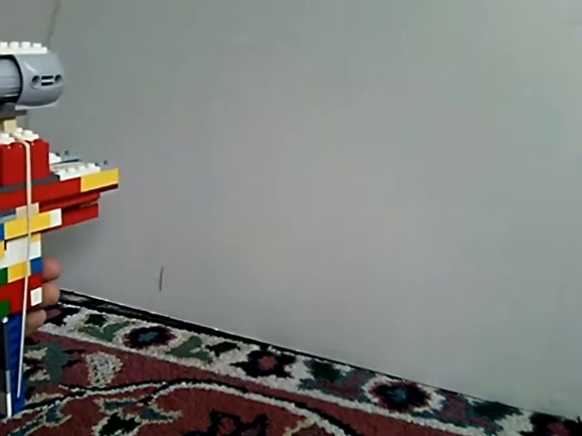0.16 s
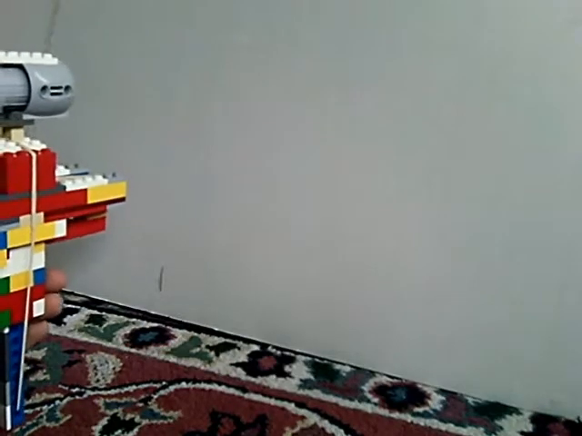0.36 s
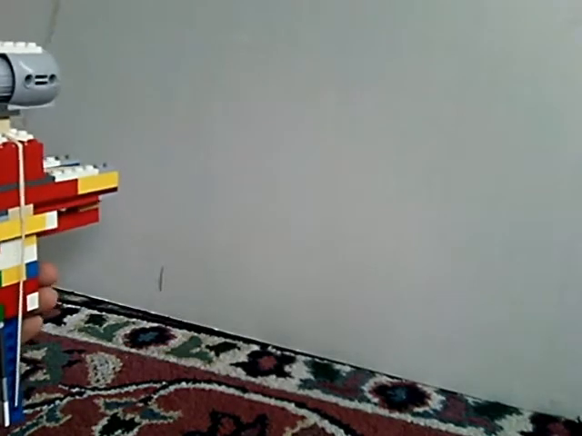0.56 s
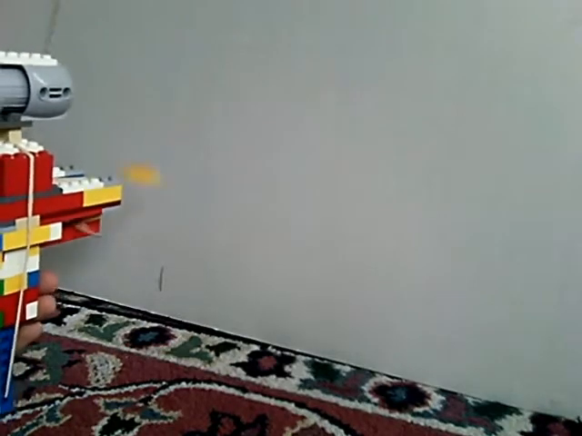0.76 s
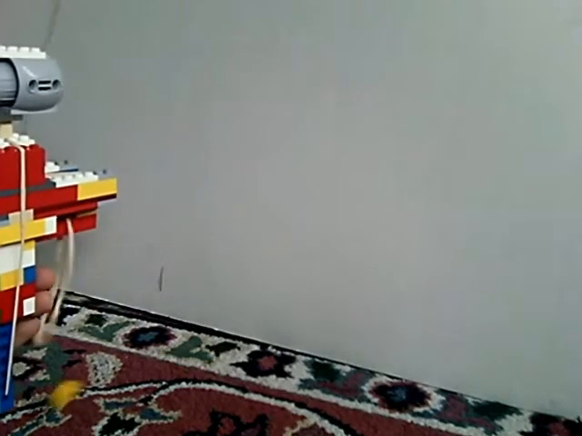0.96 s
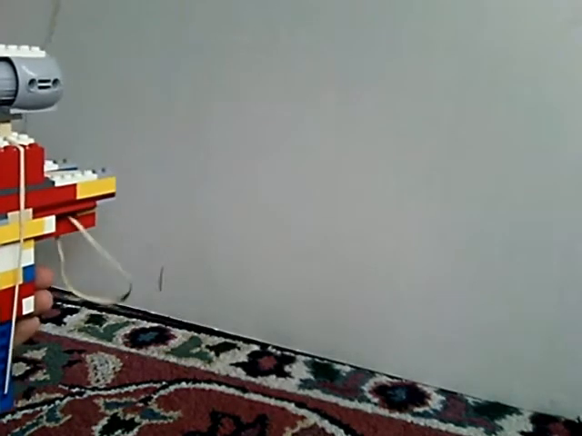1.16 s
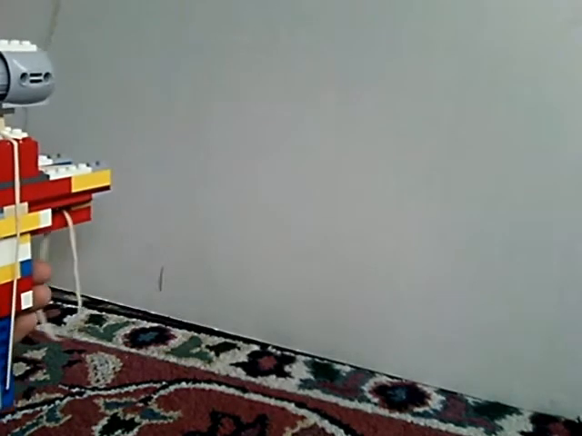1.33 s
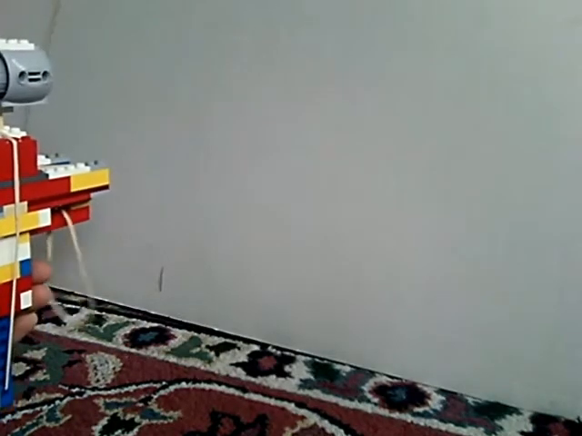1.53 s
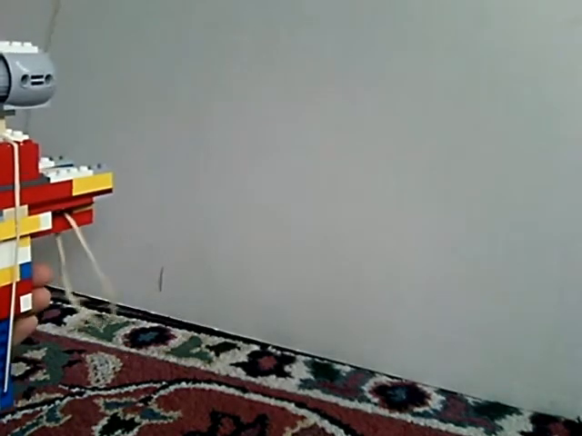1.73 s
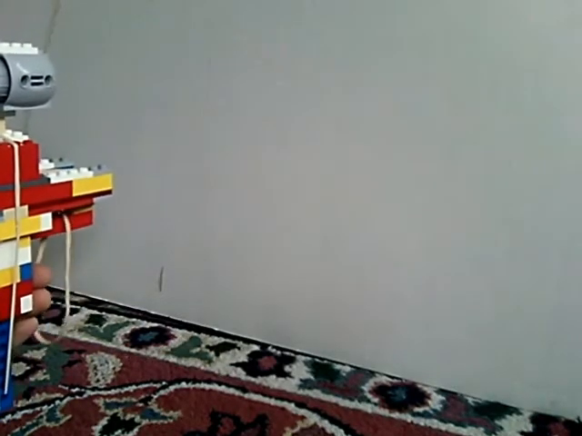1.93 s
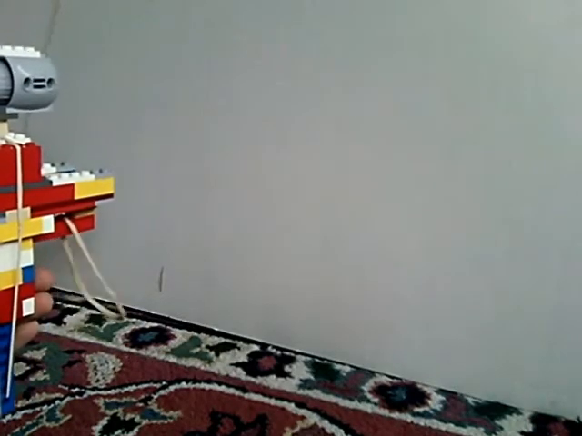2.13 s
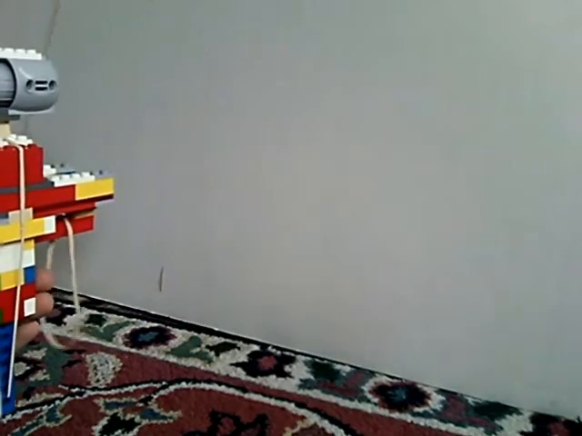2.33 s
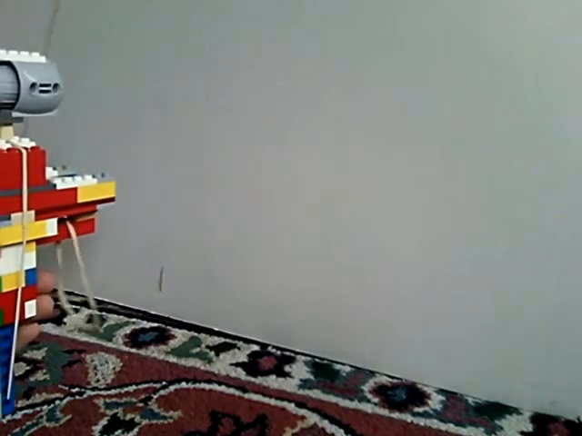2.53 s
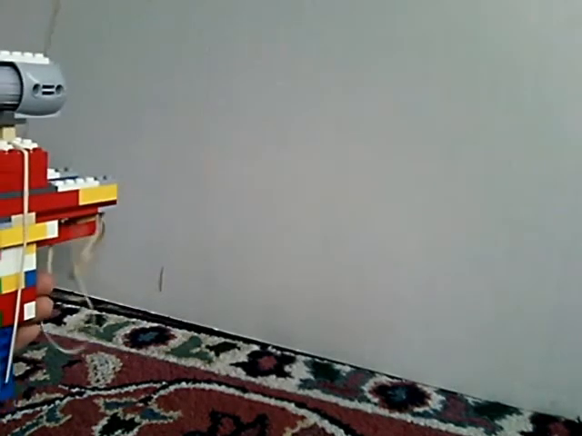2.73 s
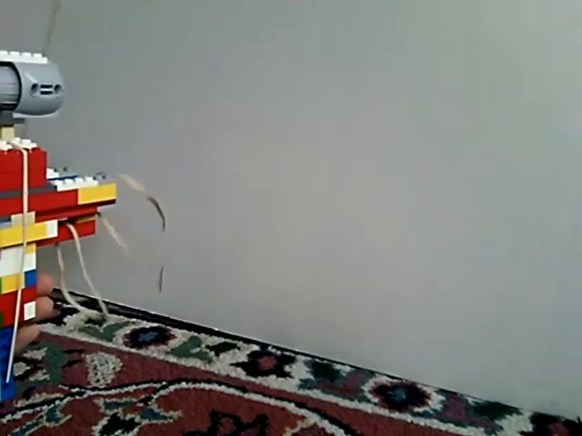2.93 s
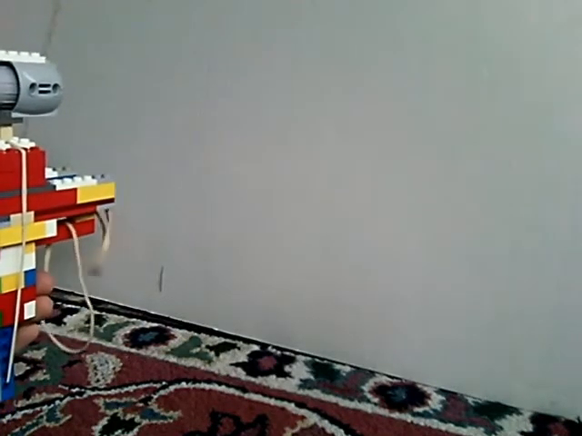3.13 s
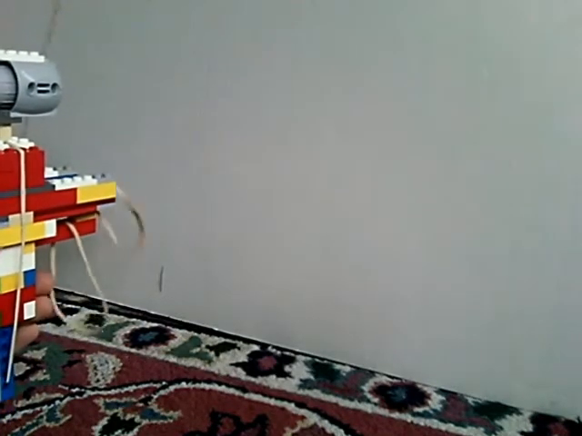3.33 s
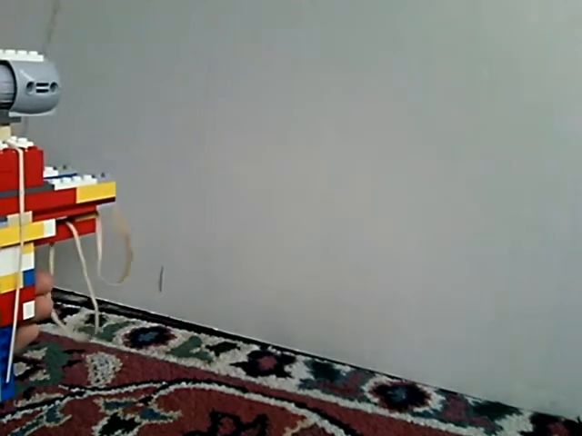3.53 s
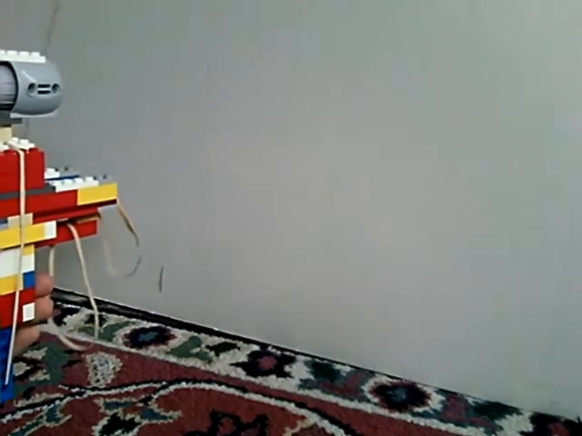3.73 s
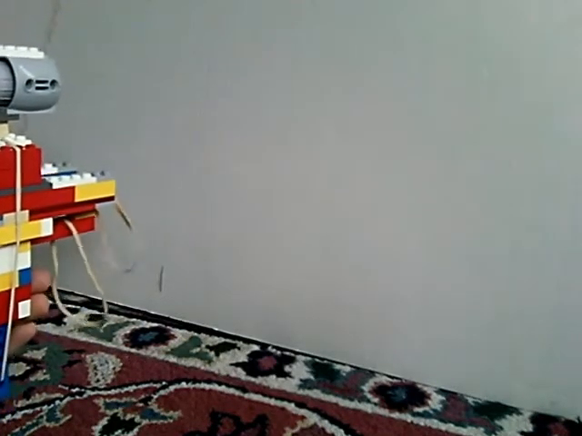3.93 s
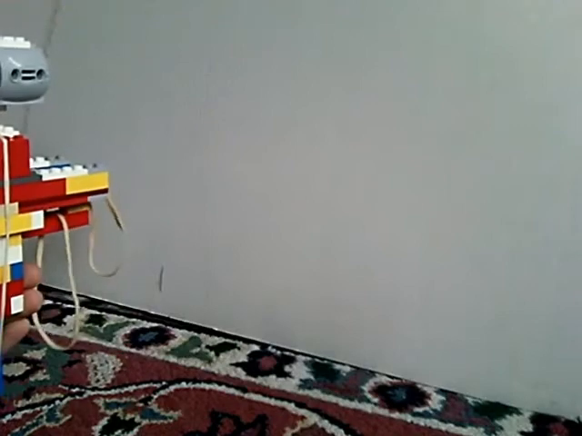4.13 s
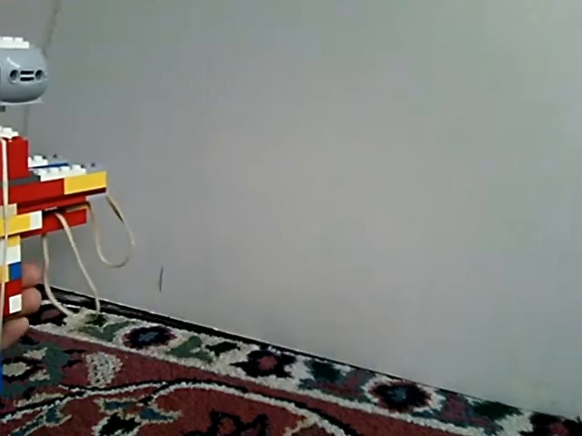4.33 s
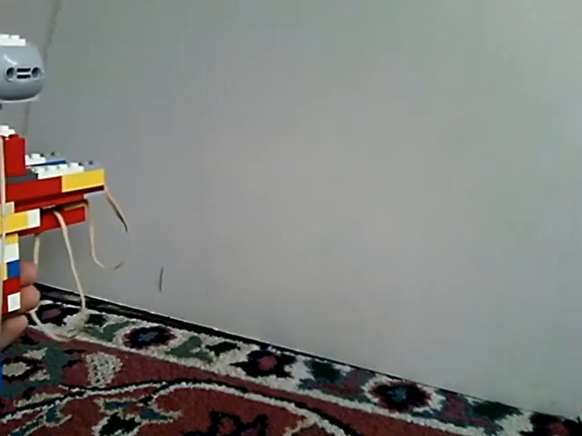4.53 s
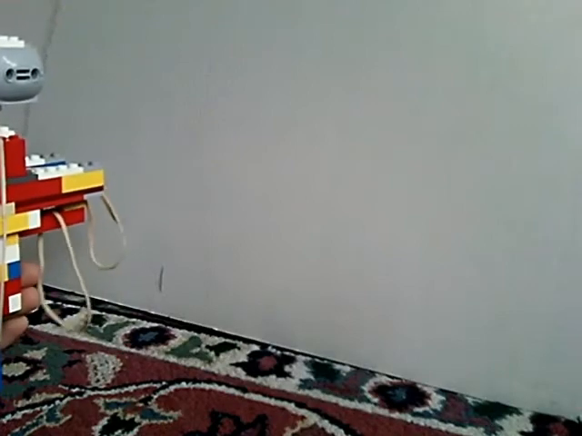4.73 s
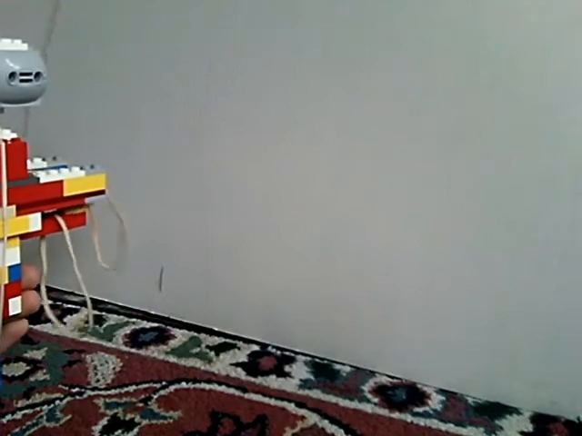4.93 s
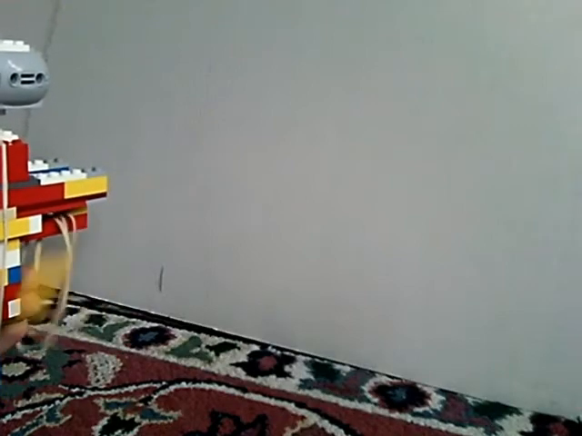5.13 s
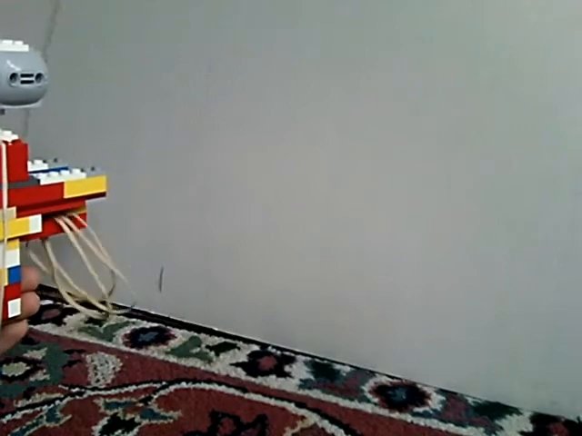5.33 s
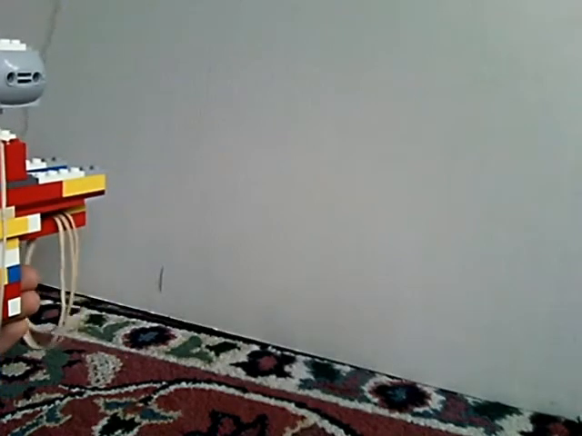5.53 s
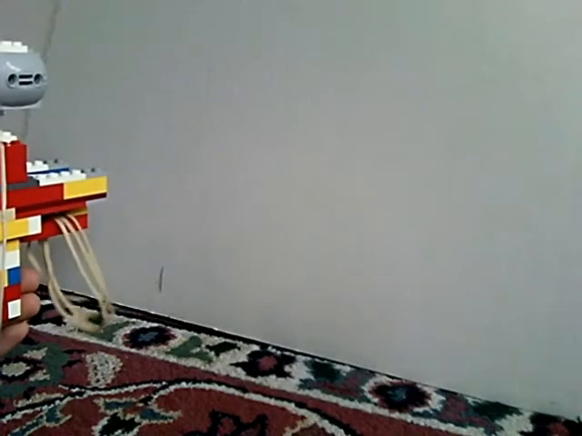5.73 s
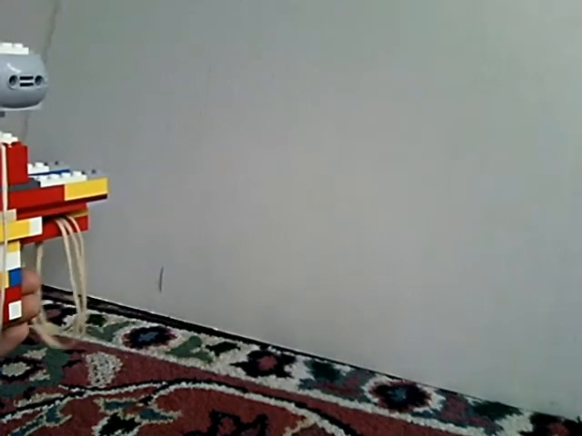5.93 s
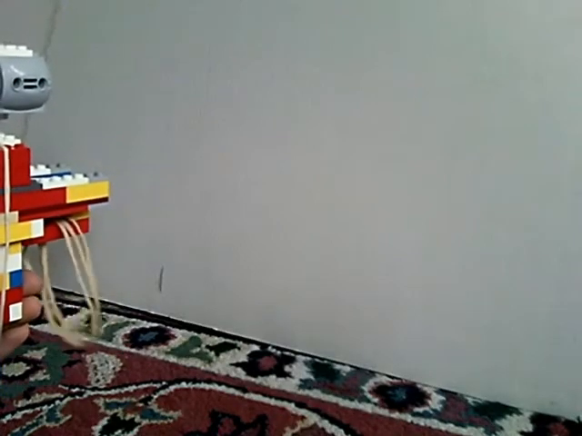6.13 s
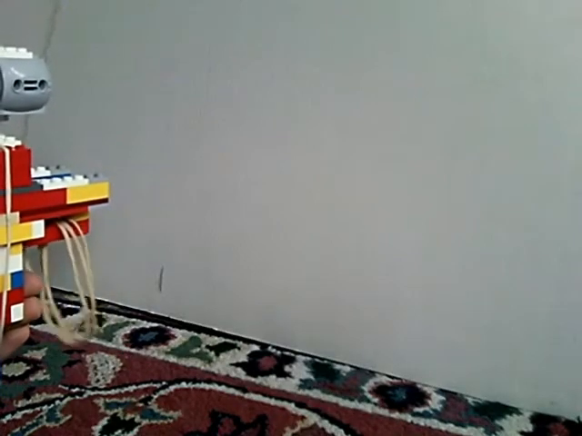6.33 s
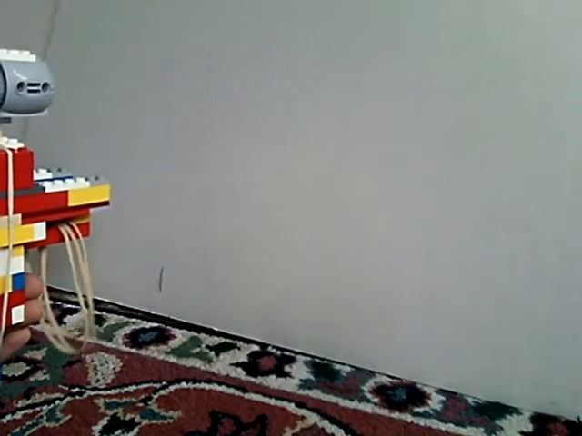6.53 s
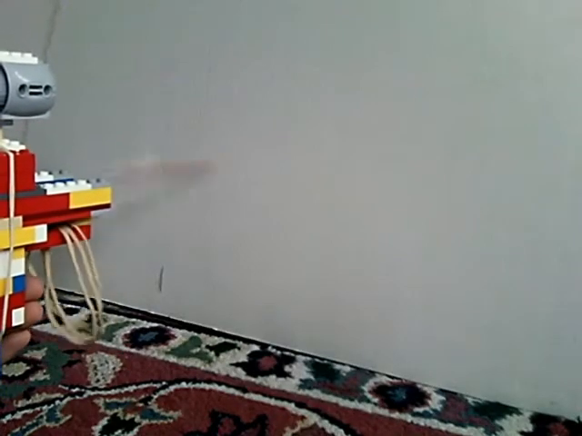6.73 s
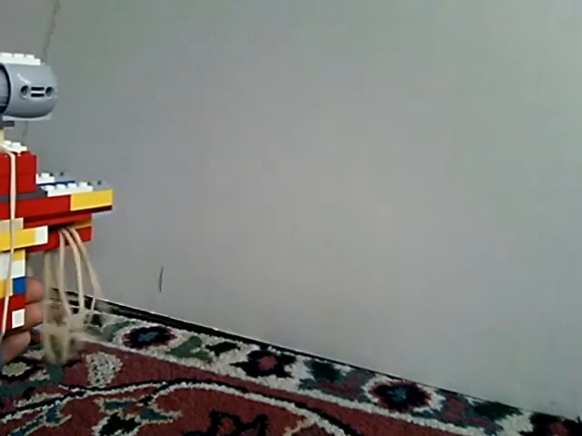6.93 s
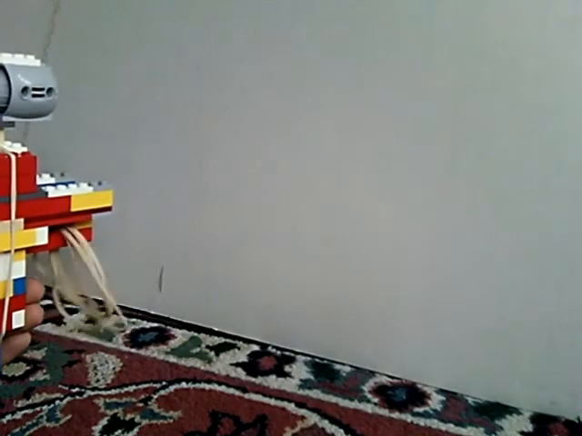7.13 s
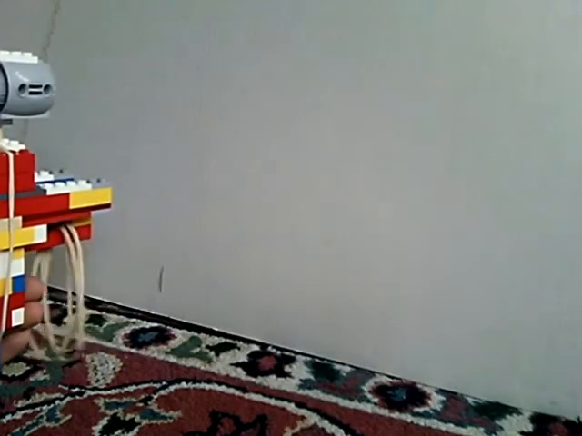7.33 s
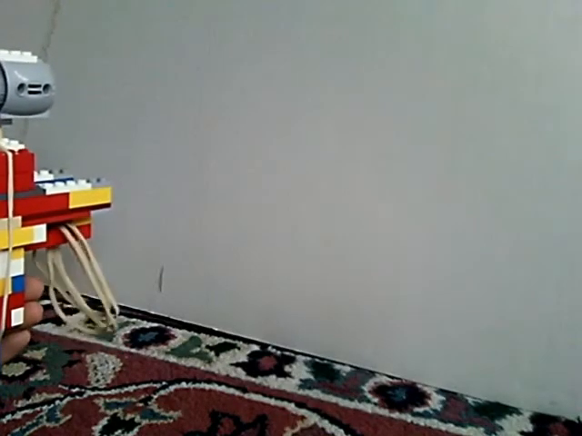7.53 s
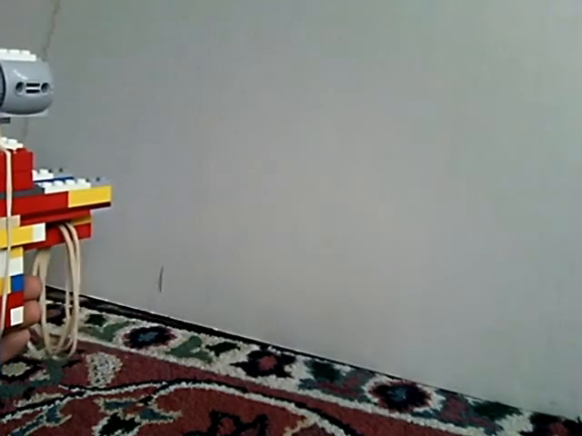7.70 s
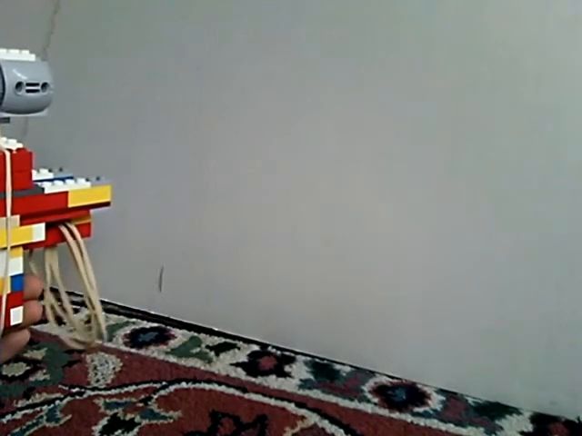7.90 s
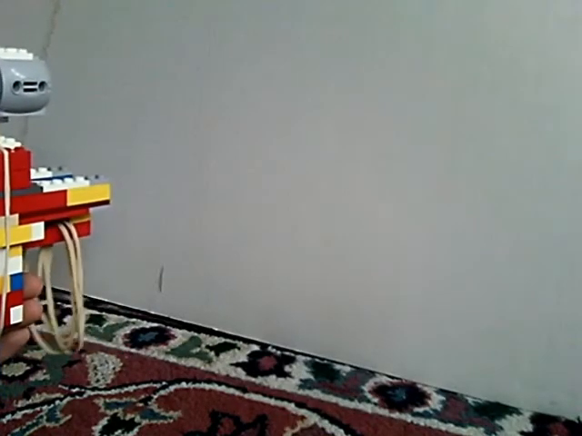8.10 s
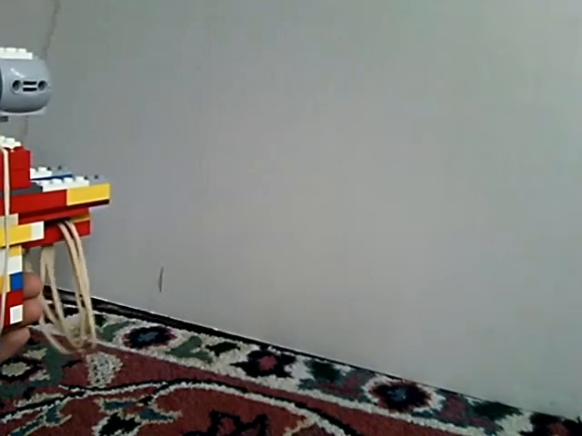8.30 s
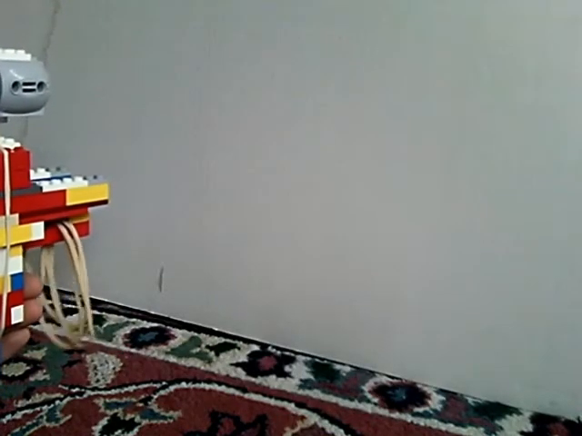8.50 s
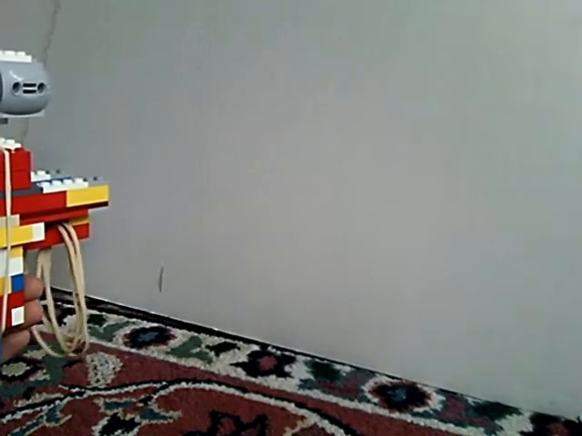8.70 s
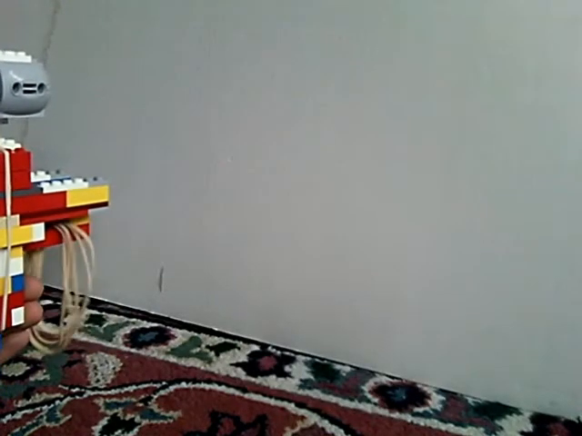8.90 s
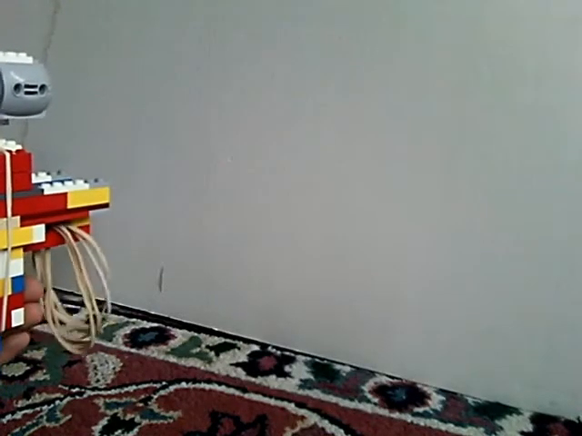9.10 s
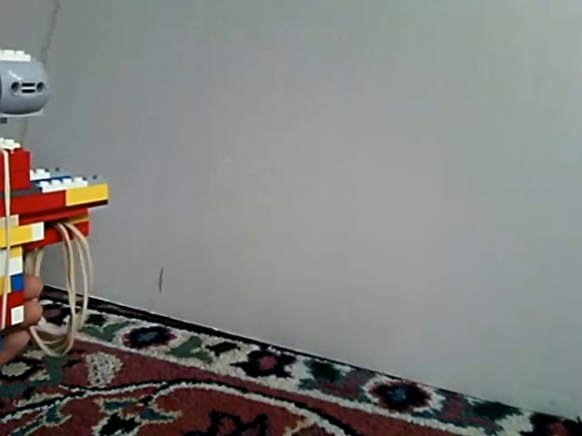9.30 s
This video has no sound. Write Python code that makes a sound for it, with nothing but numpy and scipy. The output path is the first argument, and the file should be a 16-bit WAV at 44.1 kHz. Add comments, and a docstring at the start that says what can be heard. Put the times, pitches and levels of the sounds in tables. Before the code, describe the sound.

Five rubber-band shots from a rattling plastic toy gun strike a booming wall in a small quiet room with faint hiss and hum.

```python
"""A toy gun of plastic bricks, driven by rubber bands, fires five times at a wall in a small quiet room.
Hiss and a wavering hum last throughout; a low drone dies away at the start. In each shot the slide snaps free,
rattles down the barrel and slams into its stop (noise through resonances); then the hollow wall booms
(filtered noise and decaying sines), overloading the input stage. Between shots rebounding bricks clack on other
bricks or thud on carpet, a brick or the lever rings on roughly (resonated noise) and the trigger clicks back."""
import sys
import numpy as np
from scipy import signal
from scipy.fft import rfft, irfft
from scipy.io import wavfile
from scipy.ndimage import uniform_filter1d

SR = 44100
rng = np.random.default_rng(int(sys.argv[2]) if len(sys.argv) > 2 else 0)


def digitize_waveform(pressure):
    """Quantize a signal to 16-bit integers and store it at the path in sys.argv[1].

    Rows of a 2-D input are taken as channels; values are limited to [-1, 1].
    """
    field = np.atleast_2d(pressure).T
    bounded = np.clip(field, -1, 1)
    quanta = np.round(bounded * 32767).astype(np.int16)
    wavfile.write(sys.argv[1], SR, quanta)


N = 417186
T = np.arange(int(.6 * SR)) / SR  # time within one impact or room tail (s)


def gain_of(db):
    """Level law: decibels to an amplitude ratio."""
    return 10 ** (np.asarray(db) / 20)


def evened(x):
    """Power normalization: scales to an rms of one."""
    return x / np.sqrt(np.mean(x ** 2) + 1e-20)


def sized(x):
    """Energy normalization: scales a hit to the energy of five milliseconds at an rms of one."""
    return x / np.sqrt(np.sum(x ** 2) / (.005 * SR))


def read(points, hz):
    """Interpolation of a spectrum on a log-frequency axis."""
    f, value = np.transpose(points)
    return np.interp(np.log(hz + 1), np.log(f + 1), value)


def add(mix, s, sound):
    """Superposition: mixes a sound in at time s."""
    part = mix[round(s * SR):][:len(sound)]
    part += sound[:len(part)]


def fade(t60):
    """Exponential damping: decay by 60 dB in t60 seconds."""
    return np.exp(-np.log(1000) * T / t60)


def colour(x, points, tilt_db=0):
    """Minimum-phase filtering: a causal response with the given spectrum, tilted by some dB per octave."""
    hz = abs(np.fft.fftfreq(4096, 1 / SR))
    octaves = np.log2(np.maximum(hz, 200) / 2000)
    log_gain = np.log(gain_of(read(points, hz) + tilt_db * octaves))
    # the Hilbert transform of the log gain gives the phase of a causal response
    taps = np.fft.ifft(np.exp(np.conj(signal.hilbert(log_gain)))).real
    return signal.fftconvolve(x, taps[:len(taps) // 2])[:len(x)]


def resonate(x, modes, pitch=1):
    """Modal resonance: adds narrow peaks to a sound, all scaled in frequency by pitch."""
    out = x
    for hz, width, db in modes:
        out = out + gain_of(db) * signal.lfilter(*signal.iirpeak(hz * pitch, hz / width, SR), x)
    return out


def chatter(t60, rise=0.00031, count=4):
    """Broadband excitation: a swelling, then dying flurry of tiny contacts drives all frequencies about equally."""
    envelope = (fade(t60) * (1 - np.exp(-(T / rise) ** 2)))[:4096]
    x = rng.standard_normal(len(envelope)) * envelope
    for _ in range(count):
        # alternately flatten the spectrum and restore a swell and decay
        flat = irfft(np.exp(1j * np.angle(rfft(x))))
        x = flat * np.sqrt(envelope)
    return x


# Decay of the room before the gate-like fade. Each row: frequency in Hz, t60 in s.
ROOM_DECAY = [(150, 0.71), (500, 0.36), (1400, 0.24), (3500, 0.25), (6000, 0.26), (10000, 0.2)]


def room(x, onset=0.00063, closing=0.19):
    """Reverberation: dense reflections build up quickly and decay; a gate-like fade then closes the tail."""
    hz, t, z = signal.stft(rng.standard_normal(len(T)), SR, nperseg=256)
    decay = np.exp(-np.log(1000) * t / read(ROOM_DECAY, hz)[:, None])
    tail = signal.istft(z * decay, SR, nperseg=256)[1][:len(T)]
    tail *= (1 - np.exp(-(T / onset) ** 2)) * np.exp(-(T / closing) ** 2)
    return signal.oaconvolve(x, tail / np.linalg.norm(tail))[:len(x)]


def plastic(rows, spectrum, modes, rattle_t60, rise, detune):
    """Impact on jointed bodies: each blow chatters through the bricks, whose resonances shift with the spot."""
    out = np.zeros(N)
    for s, db, tilt_db in rows:
        spot = rng.uniform(-1, 1)
        blow = resonate(chatter(rattle_t60, rise), modes, 1 + detune * spot)
        add(out, s - rise / 2, gain_of(db) * sized(colour(blow, spectrum, tilt_db)))
    return out


# The band lets go and drives the slide to its stop. Each row: snap time in seconds, snap level in dB,
# brightness in dB per octave, travel time in seconds, slam at the stop in dB above the snap.
SHOTS = [(0.6347, -11.5, -1.5, 0.02, 2.5), (2.505, -11, -1.5, 0.017, 0.5), (4.882, -12, -1.5, 0.022, 2.5),
         (6.675, -11, -1, .0195, 1.5), (8.641, -13, -1.5, .02, 3)]
# The catch slips just before the snap: lead in s, level in dB relative to the snap.
SLIP_S, SLIP_DB = .003, -10
# The slide bumps over studs: dB relative to the snap, random spread in dB,
# timing jitter in stud spacings, added brightness in dB per octave.
STUD_DB, STUD_SPREAD_DB, STUD_JITTER, STUD_TILT_DB = -4, 2.5, .2, 1.5
# It bounces off the stop twice, each landing duller and much weaker.
BOUNCE_S, BOUNCE_DB, BOUNCE_TILT_DB = .0115, -3.5, -0.5


def slide_blows(count=3):
    """Elastic release and repeated impact: slip, snap, bumps along the barrel, slam and two bounces.

    Yields time in s, level in dB, brightness in dB per octave."""
    for s, db, tilt_db, travel_s, slam_db in SHOTS:
        yield s - SLIP_S, db + SLIP_DB, tilt_db
        yield s, db, tilt_db
        for k, (early, hard) in enumerate(rng.uniform(-1, 1, (count, 2))):
            way = (k + 1 + STUD_JITTER * early) / (count + 1)
            yield s + way * travel_s, db + STUD_DB + STUD_SPREAD_DB * hard, tilt_db + STUD_TILT_DB
        for k in range(count):
            yield s + travel_s + k * BOUNCE_S, db + slam_db + k * k * BOUNCE_DB, tilt_db + k * BOUNCE_TILT_DB


# Broad colour of the slide. Each row: frequency in Hz, relative level in dB.
SLIDE_COLOUR = [(100, -22.5), (400, -9.5), (1000, -7), (1500, -3), (2100, 6.5), (3100, 2.5), (5000, -1.5),
                (7500, -1), (10500, -7)]
# Resonances stirred by the slide. Each row: nominal frequency in Hz, width in Hz, relative level in dB.
GUN_MODES = [(666, 310, -6.5), (1390, 300, -3.5), (1890, 190, -11), (2150, 300, -5.5), (2660, 50, -12),
             (3040, 72, 7.5), (3340, 63, -1), (4130, 230, 6), (5560, 220, 1)]


def slide_rattle():
    """Modal excitation by impact: the slide's blows ring the jointed body of the gun."""
    return plastic(slide_blows(), SLIDE_COLOUR, GUN_MODES, rattle_t60=0.05, rise=.001, detune=0.094)


# The trigger clicks home. Each row: time in seconds, level in dB, brightness in dB per octave.
TRIGGER = [(1.626, -10.5, 1.5), (3.994, -12.5, 0), (5.7305, -11.5, 0), (7.9224, -13.5, .5)]
# It scrapes ever harder as it nears its seat, then rebounds once: steps in s, levels in dB per step.
SCRAPE_S, SCRAPE_DB, SEAT_S, SEAT_DB = .003, -12.5, .0035, -9.5


def trigger_blows(count=3):
    """Sliding friction and impact: a growing scrape, the click and a rebound.

    Yields time in s, level in dB, brightness in dB per octave."""
    for s, db, tilt_db in TRIGGER:
        for k in range(count):  # k = 0 is the click, the others precede it
            yield s - k * SCRAPE_S, db + k * SCRAPE_DB, tilt_db
        yield s + SEAT_S, db + SEAT_DB, tilt_db


# Broad colour of the trigger lever. Each row: frequency in Hz, relative level in dB.
LEVER_COLOUR = [(100, -32), (400, -13), (950, -9.5), (1400, -4), (2200, -3.5), (3200, -5), (5000, -8.5),
                (7500, -11.5), (10500, -20)]
# Resonances stirred by the trigger. Each row: nominal frequency in Hz, width in Hz, relative level in dB.
LEVER_MODES = [(636, 210, 2), (1415, 130, 2.5), (1980, 240, 2), (2163, 140, 7), (2650, 74, 4.5),
               (3020, 130, 0.5), (3250, 130, 2), (4000, 200, -6.5), (4340, 200, -6), (6380, 78, -1)]


def trigger_return():
    """Modal excitation by impact: the trigger's small blows ring its lever."""
    return plastic(trigger_blows(), LEVER_COLOUR, LEVER_MODES, rattle_t60=0.0258, rise=.0012, detune=0.028)


def gun(slide_room_db=-6, lever_room_db=-9):
    """Direct and reverberant sound: firing rattle and trigger return, with their echo in the room."""
    slide = slide_rattle()
    lever = trigger_return()
    return slide + lever + room(gain_of(slide_room_db) * slide + gain_of(lever_room_db) * lever)


# Wall and room modes. Each row: frequency in Hz, relative level in dB before the tilt.
WALL_MODES = [(183, -8), (293, -6), (320, 0), (342, -4), (366, -2), (412, -7), (444, -7), (498, -1),
              (528, -1), (581, -6), (622, -9), (676, -7), (703, -8), (791, -11), (859, -10), (891, -11),
              (982, -12), (1017, -12), (1052, -9), (1093, -8), (1155, -9), (1262, -11), (1319, -13),
              (1346, -14), (1534, -13), (1567, -12), (1596, -14), (1647, -12), (1876, -15)]
# Colour of the wall's dense ringing. Each row: frequency in Hz, relative level in dB.
WALL_WASH = [(40, 4), (130, -8), (240, -13), (330, 1.5), (520, -0.5), (900, -3), (1200, -2), (1700, -6),
             (2300, -13.5), (4000, -12), (10000, -17)]


def wall_ring(modes_db=4, modes_tilt_db=1, wash_db=1, modes_t60=0.26, wash_t60=0.37):
    """Modal decay: damped low modes in a dense ringing too crowded to resolve."""
    modes = np.zeros(len(T))
    for k, (hz, db) in enumerate(WALL_MODES):
        sign = (-1) ** k
        modes += sign * gain_of(db + modes_tilt_db * np.log2(hz)) * np.sin(2 * np.pi * hz * T)
    wash = colour(rng.standard_normal(len(T)) * fade(wash_t60), WALL_WASH)
    return gain_of(modes_db) * sized(modes * fade(modes_t60)) + gain_of(wash_db) * sized(wash)


# The panel's strongest, quickly damped resonances. Each row: frequency in Hz, width in Hz, relative level in dB.
WALL_KNOCK = [(338, 68, 3.5), (499, 26, 1)]
# Colour of the wall's first crack. Each row: frequency in Hz, relative level in dB.
WALL_CRACK = [(100, -20.5), (240, -19), (330, -7), (520, -2), (750, 0.5), (1150, -7.5), (1800, -9.5),
              (3000, -12), (6000, -36), (11000, -39)]
# The crack returns from the floor and nearby walls. Each row: delay in seconds, level in dB relative to the crack.
WALL_ECHOES = [(.0065, -15), (.012, -7), (.016, -18)]


def wall_crack(crack_db=11):
    """Early reflection: the panel's first crack is followed by discrete returns."""
    crack = np.zeros(len(T))
    for delay, db in [(0.00014, 0)] + WALL_ECHOES:
        knock = resonate(chatter(t60=0.0299), WALL_KNOCK)
        add(crack, delay, gain_of(crack_db + db) * sized(colour(knock, WALL_CRACK)))
    return crack


# The brick strikes the wall. Each row: time in seconds, strength in dB, contact time in ms (short is bright),
# after-ring in dB.
STRIKES = [(0.7553, -9.5, 0.94, -5.5), (2.5389, -2.5, 0.5, -1.5), (4.953, -7.5, 0.69, -2.5),
           (6.7098, 0, 0.51, -3), (8.6713, -2.5, 0.57, -1.5)]
# Broad colour of a brick. Each row: frequency in Hz, relative level in dB.
BRICK_COLOUR = [(100, -8), (300, -5.5), (900, -0.5), (1450, 6), (2300, 0.5), (3300, -3), (5000, -7),
                (7500, -18.5), (10500, -27)]


def wall(tick_db=-5):
    """Impulse response: the same panel answers every strike, with the brick's own tick on top."""
    ring = wall_ring()
    crack = wall_crack()
    out = np.zeros(N)
    for s, db, contact_ms, ring_db in STRIKES:
        # a blow cannot excite vibrations much faster than its contact time
        soften = signal.butter(3, min(1000 / contact_ms, SR / 3), fs=SR)
        add(out, s, gain_of(db) * signal.lfilter(*soften, crack + gain_of(ring_db) * ring))
        tick = sized(colour(chatter(t60=0.039), BRICK_COLOUR))
        add(out, s, gain_of(db + tick_db) * tick)
    return out


# A rebounding brick lands on hard plastic. Each row: time in seconds, level in dB, brightness in dB per octave,
# room in dB relative to the direct clack, pitch as a factor on its resonances and colour.
CLACKS = [(3.0862, -23, -1, 0, 1.2), (3.103, -37, 0, 6, 1.2), (5.185, -3, 0, -9.5, 0.963),
          (5.237, -4.5, -1.5, -13, .97), (7.3389, -23.5, 0, 2, 1.22)]
# Resonances of a loose brick at pitch 1. Each row: frequency in Hz, width in Hz, relative level in dB.
BRICK_MODES = [(1480, 58, 0), (2544, 180, 1.5), (3450, 27, -16), (4370, 150, -8)]


def rebounds():
    """Direct-to-reverberant ratio: bricks clack together, each with its own share of room."""
    out = np.zeros(N)
    for s, db, tilt_db, room_db, pitch in CLACKS:
        ringing = resonate(chatter(t60=0.046, rise=0.00095), BRICK_MODES, pitch)
        shifted_colour = np.multiply(BRICK_COLOUR, (pitch, 1))
        clack = np.zeros(len(T))  # leaves time for the room to die away
        add(clack, 0, sized(colour(ringing, shifted_colour, tilt_db)))
        add(out, s, gain_of(db) * (clack + gain_of(room_db) * room(clack)))
    return out


# A struck brick or the trigger lever rings on at one resonance, roughly, and is cut off shortly after.
# Each row: start in seconds, length in seconds, resonance in Hz, level in dB.
RING_ONS = [(5.198, .035, 1550, -39), (5.258, 0.06, 1555, -33.5), (5.763, .047, 1366, -43)]


def rough_ringing(sharpness=80, pulses_per_s=450, fall_db_per_s=40):
    """Resonance under random excitation: one mode rings on roughly, weakens, and is cut off shortly after."""
    out = np.zeros(N)
    for start, length, hz, db in RING_ONS:
        t = np.arange(0, max(length, .01), 1 / SR)
        drive = rng.standard_normal(len(t)) * (rng.random(len(t)) < pulses_per_s / SR)
        drive += 0.028 * rng.standard_normal(len(t))  # faint noise between pulses
        ring = signal.lfilter(*signal.iirpeak(hz, sharpness, SR), drive) * gain_of(-fall_db_per_s * t)
        add(out, start, gain_of(db) * evened(ring) * signal.windows.tukey(len(t), .2))
    return out


# Soft thuds on the carpet. Each row: time in seconds, level in dB, brightness in dB per octave.
THUDS = [(3.195, -32.5, -3), (3.215, -42, -3), (5.417, -41.5, 2.5), (9.196, -35.5, 1.5), (9.379, -44, 2)]
# Colour of a carpet thud. Each row: frequency in Hz, relative level in dB.
CARPET_COLOUR = [(40, -42), (150, 3), (320, -4), (550, -9), (1000, -6), (2000, -29), (8000, -45)]
# The floor under the carpet. Each row: frequency in Hz, width in Hz, relative level in dB.
FLOOR_MODES = [(327, 110, 6)]


def carpet(room_db=-4):
    """Compliant contact: a soft landing excites little treble and one broad mode of the floor."""
    out = np.zeros(N)
    for s, db, tilt_db in THUDS:
        landing = resonate(chatter(t60=0.048, rise=0.0017), FLOOR_MODES)
        add(out, s, gain_of(db) * sized(colour(landing, CARPET_COLOUR, tilt_db)))
    return out + gain_of(room_db) * room(out)


# Steady rumble and hiss. Each row: frequency in Hz, relative density in dB per Hz.
HISS_SPECTRUM = [(9, 1.5), (32, -1.5), (58, -8), (122, -7), (144, -13.5), (175, -6.5), (201, -13.5),
                 (280, -13), (312, -17.5), (369, -15), (558, -18.5), (900, -22), (1450, -23.5),
                 (2200, -29.5), (5000, -34), (11000, -36), (14300, -101)]
HISS_DB = -43  # overall rms
# Faint hum. Each row: frequency in Hz, rms level in dB.
HUM = [(86.1, -56.5), (118.4, -60.5), (177.6, -56.5), (236.9, -60), (565.2, -65.5)]
# A low drone, steady at first, that dies away.
DRONE_DB, DRONE_HOLD_S, DRONE_FALL_DB_PER_S = -39.5, .15, 20


def background(waver=0.48, drone_hz=121):
    """Stationary noise and modulated tones: room rumble, microphone hiss, wavering hum and a dying drone."""
    t, hz = np.arange(N) / SR, np.fft.rfftfreq(N, 1 / SR)
    white = rng.standard_normal(N)
    hiss = evened(irfft(rfft(white) * gain_of(read(HISS_SPECTRUM, hz)), N))
    knots = np.linspace(0, t[-1], num=40)

    def tone(f):
        """Complex modulation: a line of unit rms drifts in strength and phase."""
        drift = 1 + waver * (rng.standard_normal(len(knots)) + 1j * rng.standard_normal(len(knots)))
        return evened((np.interp(t, knots, drift) * np.exp(2j * np.pi * f * t)).real)

    hum = sum(gain_of(db) * tone(f) for f, db in HUM)
    drone_db = DRONE_DB - DRONE_FALL_DB_PER_S * np.maximum(t - DRONE_HOLD_S, 0)
    return gain_of(HISS_DB) * hiss + hum + gain_of(drone_db) * tone(drone_hz)


def scene():
    """Superposition: all sources add at the microphone."""
    return (gun() + wall() + rebounds() + rough_ringing() + carpet() + background())[None]


def record(dry, knee=6, heavy=0.93, sag=1.75, recover_hz=17, edge_hz=11250):
    """Saturation: the input stage clips with a rounded knee; long, heavy overload swings its bias down briefly."""
    rail = .51
    overload = uniform_filter1d(1. * (abs(dry) > heavy), int(.012 * SR)) ** 2
    bias = sag * signal.lfilter(*signal.butter(2, recover_hz, fs=SR), overload)
    # less room below as the bias swings down: the lower rail stays put
    limit = np.where(dry > 0, rail, np.maximum(rail - bias, .1))
    clipped = dry / (1 + abs(dry / limit) ** knee) ** (1 / knee) - bias
    lowpass = signal.firwin(255, edge_hz, window=("kaiser", 8), fs=SR)
    return signal.oaconvolve(clipped, lowpass[None], "same")


dry = scene()
out = record(dry)
digitize_waveform(out)
```